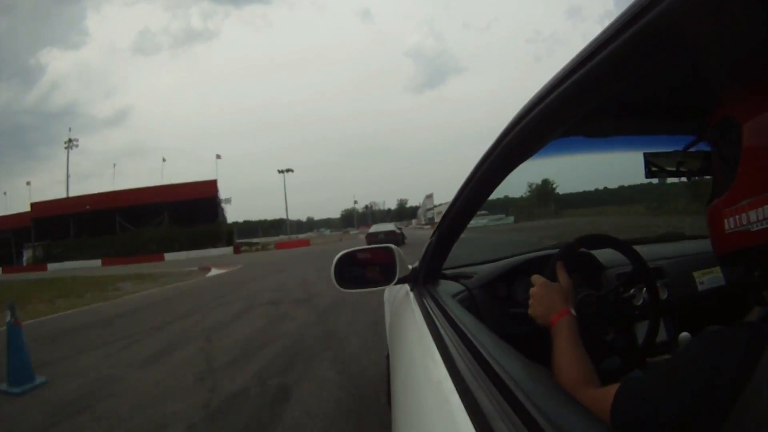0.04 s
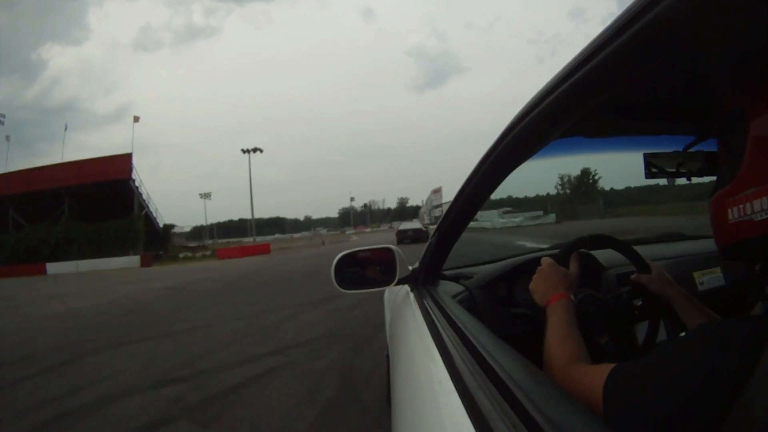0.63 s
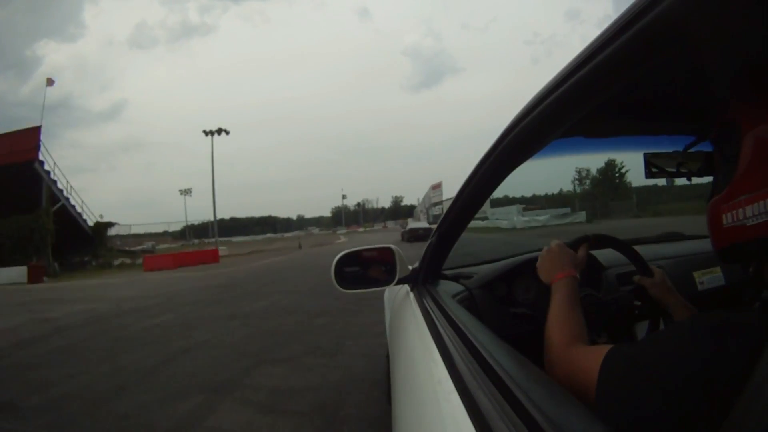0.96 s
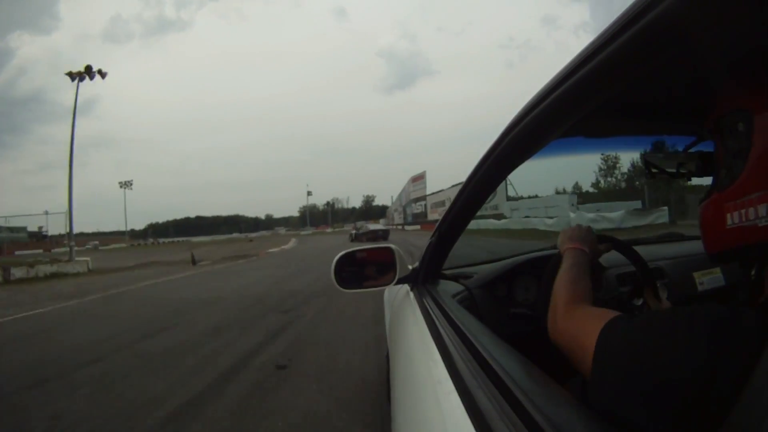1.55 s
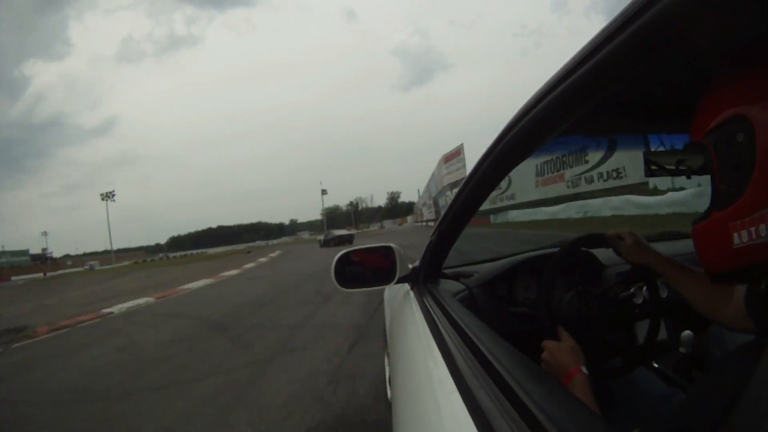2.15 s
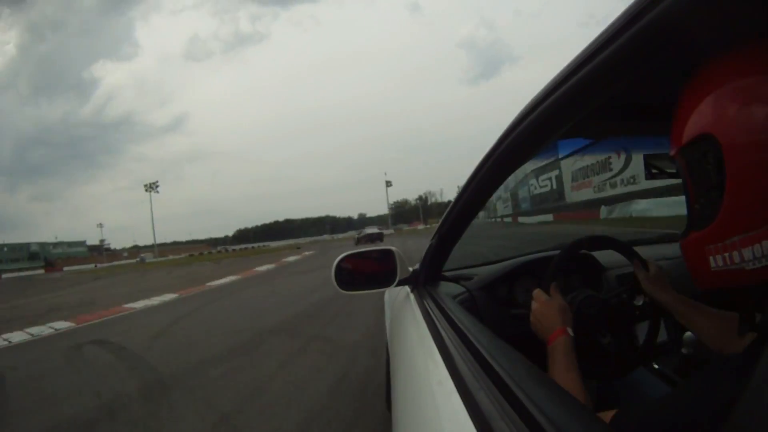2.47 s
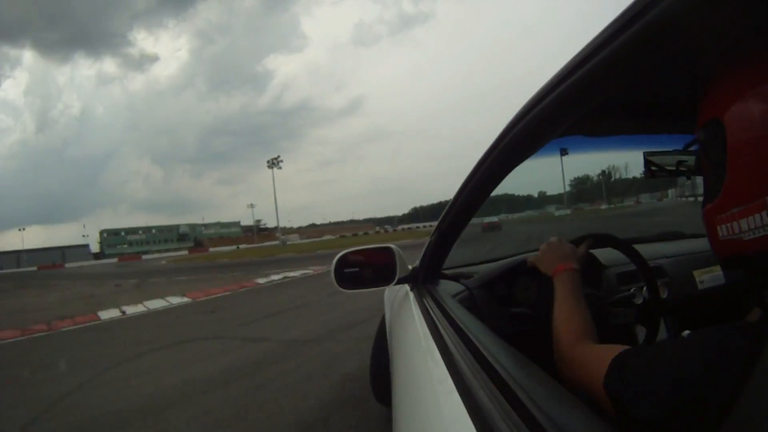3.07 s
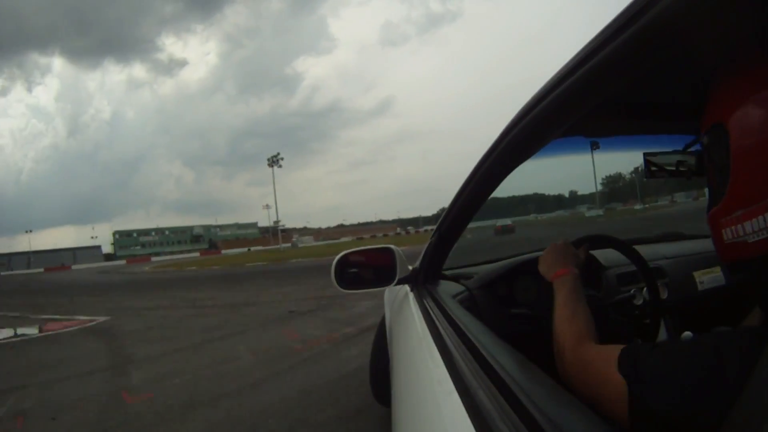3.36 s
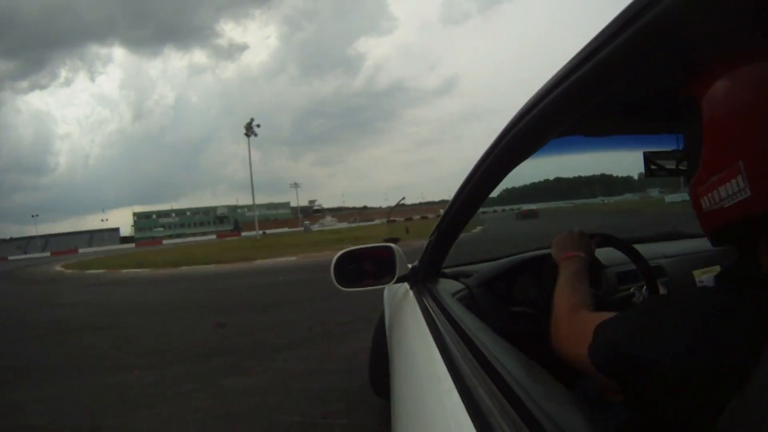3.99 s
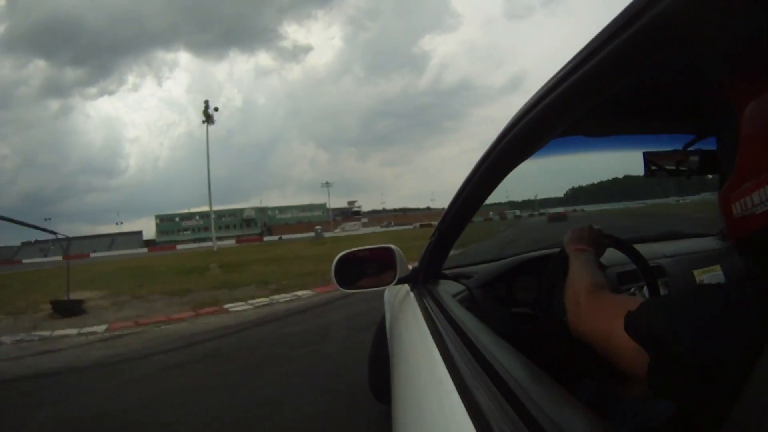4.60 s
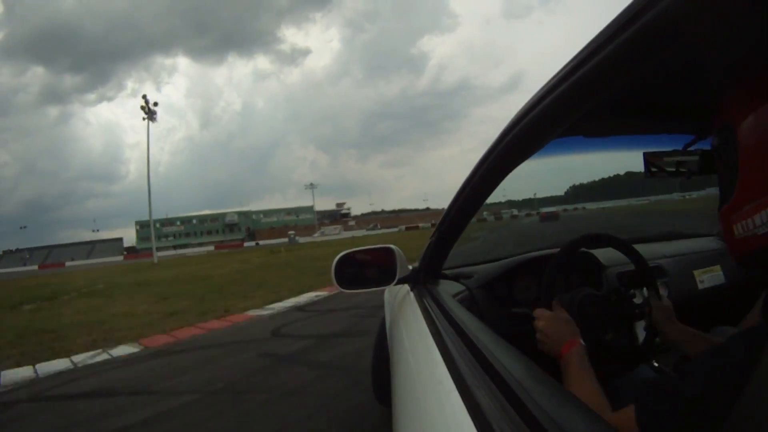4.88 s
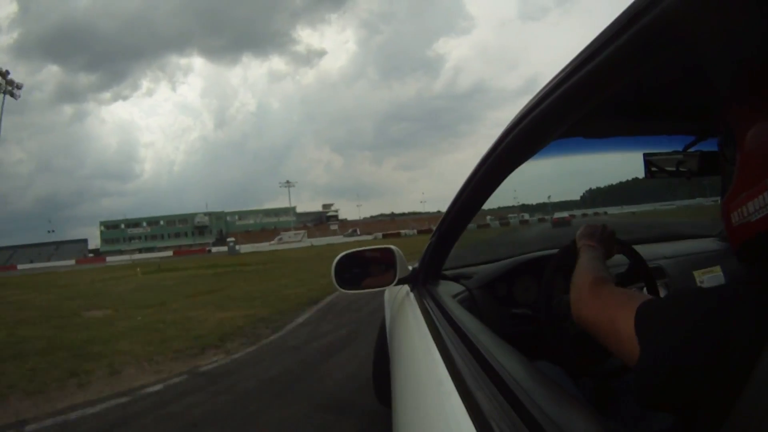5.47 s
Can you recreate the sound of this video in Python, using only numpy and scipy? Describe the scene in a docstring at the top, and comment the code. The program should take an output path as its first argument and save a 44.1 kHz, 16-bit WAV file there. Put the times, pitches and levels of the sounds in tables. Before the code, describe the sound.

Inside a car on a racing circuit, wind rushes and throbs at an open window over road roar and a steady four-cylinder drone. About two seconds in, the engine flares and stays high, its revs wavering. The tyres chirp a few times, then squeal and screech through a long slide with brief breaks, while the wind hiss falls back. A small microphone by the door gives a slightly gritty sound.

```python
"""Inside a drift car with the window open. A four-cylinder engine pulls, flares at a clutch kick and stays
high, its firings droning under the exhaust orders. The tyres break loose, and their tread sticks and slips
in squeals and screeches through a long slide. Wind buffets the cabin and rushes past the door over road
roar. A small camera in a housing takes it in at a low sample rate, mirroring the squeal into the treble."""
import sys
import numpy as np
from scipy.fft import rfft, irfft, next_fast_len
from scipy.io import wavfile
from scipy.ndimage import uniform_filter1d, map_coordinates

SR = 44100
rng = np.random.default_rng(int(sys.argv[2]) if len(sys.argv) > 2 else 0)


def to_wav(s):
    """Save 16-bit WAV."""
    ch = np.atleast_2d(s).T  # columns
    pcm = np.round(np.clip(ch, -1, 1) * 32767)  # PCM
    wavfile.write(sys.argv[1], SR, pcm.astype(np.int16))


N = 248724


def engine(crank, crank_hz, load_db, upper_db=-40.5, cruise_hz=97.2):
    """Two firings a turn give the drone; unequal cylinders add whole and weaker half orders."""
    # the firing tone in the cabin: f/Hz, level/dB
    drone_colour = [(125, -22.5), (136, -25), (150, -29), (185, -28.5), (200, -27), (235, -29.5)]
    # resonances of pipe and cabin: f/Hz, gain/dB
    pipe_colour = [(90, 5), (200, 7.5), (260, -12), (320, -15.5), (400, 2), (450, -4), (500, 5), (600, 1),
                   (700, -10), (800, -16), (1000, 4), (1200, -10)]
    drone_db = along(drone_colour, 2 * crank_hz) + 0.84 * load_db + 2.13 * wobble(28)
    drone = amp(drone_db) * np.sin(2 * crank)
    upper = np.zeros(N)
    for order in np.r_[1.5, np.arange(2.5, 10.5, .5)]:
        db = along(pipe_colour, order * crank_hz) - 9.7 * (order % 1 > 0) + 2.7 * wobble(24)
        upper += amp(db) * np.sin(order * crank + 2 * np.pi * rng.random())
    revs_db = 3.5 * np.log2(crank_hz / cruise_hz)  # the upper orders grow with crank speed
    return drone + amp(upper_db + 0.78 * load_db + revs_db) * upper


def engine_load(answer_s=0.026, recover_s=0.03):
    """Load in dB: zero under steady throttle, moved by each stab and lift of the pedal."""
    # throttle stabs (+) and lifts (-): start/s, end/s, load/dB
    pedal = [(1.42, 1.714, 2.5), (1.91, 2.006, -3), (2.09, 2.28, 2), (2.56, 2.67, 6), (3.216, 3.48, -1),
             (3.605, 3.67, -6), (3.74, 4.12, 1.5), (4.201, 4.254, -3), (4.46, 4.661, -14.5),
             (4.72, 4.96, -5.5), (5.283, 5.45, 2), (5.58, 5.64, -11)]
    return sum(db * held(start, end, answer_s, recover_s) for start, end, db in pedal)


def tyres(judder_db=1.02):
    """Sliding tread squeals in a low mode and screeches in two high ones, over a scrub of torn rubber."""
    # hiss of tearing rubber: f/Hz, level/dB
    scrub_colour = [(700, -17.5), (1400, 1.5), (1700, -0.5), (2000, 5.5), (2350, 7), (2520, -16),
                    (2700, -2.5), (3000, -3.5), (3150, -33), (3400, -17.5), (3800, -10.5), (4020, -19),
                    (5400, -28), (5800, -16)]
    screech_colour = [(1850, 0.5), (2130, 0), (2240, 6), (2290, -0.5), (2350, 2), (2500, 2),
                      (2680, -11.5)]  # f/Hz, gain/dB
    squeal_gain, screech_gain, shrill_gain, pitch, scatter = slides()
    # the most loaded patch holds its note while the fringe strays
    core = tread(pitch, scatter * 0.336, slip_rate=130, flutter_db=3, count=1)
    fringe = tread(pitch, scatter * 1.15, slip_rate=170, flutter_db=3.5, count=6)
    squeal = steadied(fringe + amp(-1.5) * core, seconds=0.084)
    high_mode = tread(2295 + .5 * (pitch - 1065), scatter=.055, slip_rate=230, flutter_db=4.5, count=5)
    screech = steadied(coloured(high_mode, screech_colour), seconds=0.055)
    shrill = tread(3750, scatter=.022, slip_rate=200, flutter_db=3, count=3)
    scrub = amp(-8) * steadied(noise(scrub_colour) * amp(0.48 * wobble(120)), seconds=0.021)
    judder = amp(judder_db * wobble(35))  # bumps vary the load on the tread
    return judder * (squeal_gain * squeal + screech_gain * (screech + scrub) + shrill_gain * shrill)


def slides(break_s=.033, release_s=0.031, full_scatter=.06):
    """Three tread-mode gains, pitch and scatter as the driven tyres break loose and grip again."""
    # slides: start/s, end/s, f/Hz, regrip/0-1, squeal/dB, screech/dB, shrill/dB relative to screech
    skids = [(2.079, 2.154, 1083, 0.03, -28, -27.5, -30), (2.247, 2.334, 1090, 0, -39, -25, -32),
             (2.47, 2.531, 1056, 0.01, -29, -24.5, -33), (2.598, 3.589, 1060, 0.99, -17.5, -19, -39),
             (3.66, 3.77, 1055, 0, -20.5, -28.5, -35), (3.78, 3.856, 1028, 0.02, -16.5, -22, -34),
             (3.991, 4.233, 1046, 0.92, -18.5, -20, -29), (4.324, 4.512, 1062, 0.19, -18, -19, -31),
             (4.55, 5.32, 1075, 0, -18.5, -17.5, -25.5), (5.349, 5.6, 1059, .9, -18, -17.5, -26.5)]
    bite_hz, bite_s = 50.32, .04  # the squeal starts sharp and settles
    regrip_hz, regrip_s, narrowing, regrip_db = 49.7, .09, 0.691, 1  # regrip lifts, narrows, swells it
    t = np.arange(N) / SR
    squeal, screech, shrill, pitch, scatter = np.zeros((5, N))
    for start, end, hz, regrip, squeal_db, screech_db, shrill_db in skids:
        slip = held(start, end, break_s, release_s)
        bite = np.exp(-np.maximum(t - start, 0) / bite_s)
        grip = regrip * np.exp(-(np.minimum(t - end, 0) / regrip_s) ** 2)
        begun = t > start - break_s
        pitch = np.where(begun, hz + bite_hz * bite + regrip_hz * grip, pitch)
        scatter = np.where(begun, full_scatter * (1 - narrowing * grip), scatter)
        squeal = np.maximum(squeal, slip * amp(squeal_db + regrip_db * grip))
        screech = np.maximum(screech, slip * amp(screech_db))
        shrill = np.maximum(shrill, slip * amp(screech_db + shrill_db))
    return squeal, screech, shrill, pitch, scatter


def tread(pitch, scatter, slip_rate, flutter_db, count):
    """Patches of rubber stick and slip, each wandering in pitch and strength on the rough asphalt."""
    patches = np.zeros(N)
    for _ in range(count):
        strength = amp(flutter_db * wobble(slip_rate))
        hz = pitch * (1 + scatter * wobble(slip_rate))
        patches += strength * np.sin(phase_of(hz))
    return unit(patches)


def high_tyre(attack_s=0.027, release_s=0.058):
    """A less loaded tyre scuffs broadly at first, then sings thinly above the others."""
    # its squeals: start/s, end/s, f/Hz, level/dB, scatter/share of the pitch
    squeals = [(2.25, 2.326, 1630, -26, .085), (2.519, 3.2, 1280, -29.5, .08),
               (4.052, 4.18, 1370, -27, .075), (4.35, 4.45, 1350, -28.5, .07),
               (4.553, 4.722, 1267, -31, .015), (4.83, 4.929, 1275, -23.5, .015),
               (5.04, 5.12, 1258, -24, .016), (5.349, 5.538, 1287, -29, .03)]
    sound = np.zeros(N)
    for start, end, hz, db, scatter in squeals:
        envelope = amp(db) * held(start, end, attack_s, release_s)
        sound += envelope * tread(hz, scatter, slip_rate=140, flutter_db=3, count=3)
    return sound


def buffeting():
    """The cabin air throbs against the open window, with a heaving boom above it."""
    # fader ride of both layers: t/s, throb/dB, boom/dB
    ride = [(0, -28, -27.6), (0.25, -22.5, -20.5), (1.15, -22.5, -19.5), (1.4, -19, -23.5),
            (1.7, -23, -17.5), (2.05, -17, -24), (2.35, -23.5, -17.4), (2.55, -18.5, -25),
            (3.15, -28.5, -23), (3.4, -32, -25), (3.6, -18.5, -19.0), (3.8, -28, -24), (4.02, -20, -17),
            (4.2, -30.8, -24), (4.38, -17, -22), (4.65, -32.5, -28.1), (5.45, -29.6, -23.0),
            (5.64, -31, -30)]
    # sub-bass throb of the cabin air: f/Hz, level/dB
    throb_colour = [(12, -34), (22, -9), (30, 9.5), (40, 0), (55, -10.5), (90, -67), (200, -92)]
    # cabin boom: f/Hz, level/dB
    boom_colour = [(35, -13), (60, -9.5), (80, 5.5), (100, -5.5), (125, -16), (170, -22), (330, -57),
                   (1500, -110)]
    # the boom heaves (+) or drops out (-): t/s, length/s, gain/dB
    heaves = [(.55, 0.079, 3.5), (1.11, .06, 5.5), (1.27, 0.052, 6), (1.35, 0.071, -8), (2.33, .05, 3),
              (3.61, 0.039, 5), (3.69, 0.089, -3), (4.07, 0.09, 1.5), (5.04, .06, 5)]
    throb_db, boom_db = curves(ride)
    throb = amp(throb_db + 0.35 + 1.1 * wobble(12)) * steadied(noise(throb_colour), seconds=0.074)
    boom_gain = amp(boom_db + 0.1 + swells(heaves) + 1.6 * wobble(11))
    return throb + boom_gain * steadied(noise(boom_colour), seconds=0.068)


def wind_strength(breeze_db=-41.5, swirl_db=1.03):
    """Drive of the wind noise in dB over a breeze: a slow trend, brief rises and dips, a little swirl."""
    # slow trend of the wind: t/s, level/dB
    trend = [(0, -37.5), (0.5, -39.5), (1.3, -41.5), (1.65, -41), (1.95, -40.5), (2.3, -38), (2.45, -47),
             (2.85, -55), (3.05, -47), (3.55, -53.5), (3.7, -50.5), (3.92, -53), (4.08, -45.2), (4.25, -49),
             (4.4, -44), (4.55, -50.5), (5.05, -48), (5.64, -51)]
    # gusts (+) and lulls (-); the last two are dips in the hiss as the tyres briefly grip:
    # t/s, length/s, gain/dB
    rises_and_dips = [(.12, .06, 2), (.168, 0.016, 6), (0.22, 0.07, -5), (0.473, 0.02, 5.5),
                      (0.721, 0.035, 7), (0.844, 0.04, -4.5), (1.085, 0.033, 3), (1.175, 0.064, -6),
                      (1.405, 0.035, -8), (1.686, 0.12, 3.5), (1.765, .03, -6), (1.845, .03, -4),
                      (3.66, 0.076, -4), (3.93, .06, -4)]
    trend_db, = curves(trend)
    return trend_db - breeze_db + swells(rises_and_dips) + swirl_db * wobble(25.1)


def window_rush(wind_db, load_db, eddies):
    """Turbulent air rushes past the window, fluttering with the eddies."""
    # bright rush of air: f/Hz, level/dB
    colour = [(880, -18), (1500, -10), (1560, -30), (1800, -15), (1970, -0.5), (2140, -0.5), (2330, 1.5),
              (2790, -12), (2920, -9), (3270, -10), (3750, -13), (4210, -20), (5380, -17.5), (5900, -23),
              (7670, -58), (13000, -120)]
    flutter = amp(2.13 * eddies + 1.56 * wobble(260))
    rush = steadied(unit(noise(colour) * flutter), seconds=0.037)
    return amp(-24.5 + wind_db + .15 * load_db) * rush


def air_slaps(attack_s=0.00024, t60_s=0.019):
    """Eddies break on the window frame in short bright puffs."""
    # slaps of air: t/s, level/dB
    hits = [(0.457, -12), (1.064, -9.5), (1.078, -14), (1.588, -4), (1.868, -9), (2.194, -14), (4.438, -11)]
    colour = [(200, -11), (900, 3.5), (1600, -9), (2300, 10), (2800, -6.5), (3800, -2),
              (5800, -22.5)]  # f/Hz, level/dB
    t = np.arange(N) / SR
    envelope = np.zeros(N)
    for start, db in hits:
        age = np.maximum(t - start, 0)
        envelope += amp(db - 1.5 - 60 * age / t60_s) * (1 - np.exp(-age / attack_s))
    return envelope * noise(colour)


def road_roar(crank, wind_db, load_db, eddies):
    """A fluttering bed of road noise that grows with wind and engine load."""
    # midrange roar of the road: f/Hz, level/dB
    colour = [(200, -20), (330, -11.5), (440, -7), (520, 2.5), (650, 1), (780, -3), (900, -0.5),
              (1050, 4.5), (1170, -3.5), (1300, 1), (1600, -7.5), (2000, 1), (2700, -16), (4000, -49)]
    rasp = 1 + 0.091 * np.sin(2 * crank)  # exhaust gas adds a puff at each firing
    roar = steadied(unit(noise(colour) * rasp * amp(1.5 * eddies)), seconds=0.066)
    return amp(-26.5 + 0.46 * wind_db + 0.47 * load_db) * roar


def door_drumming(wind_db, load_db):
    """The door panels drum low, driven by wind and engine load."""
    # rumble of the panels: f/Hz, level/dB
    colour = [(60, -19), (110, 9), (150, 5), (190, 6.5), (240, 3), (300, -2), (370, -6), (450, -8.5),
              (900, -47)]
    return amp(-30.5 + 0.62 * wind_db + 0.46 * load_db) * steadied(noise(colour), seconds=0.08)


def housing(sound):
    """The camera housing colours the sound with narrow peaks and dips."""
    # peaks and dips: f/Hz, width/Hz, gain/dB
    bands = [(1650, 30, -3), (1685, 25, 5.5), (2400, 17, 4), (2820, 100, -2.5), (2930, 48, 4.5),
             (3250, 60, -2), (3280, 54, 2), (3450, 61, -2.5), (4480, 47, 5), (4560, 60, 0.5), (5000, 90, 0),
             (5250, 71, 2.5)]
    return filtered(sound, lambda hz: amp(sum(db * np.exp(-((hz - centre) / width) ** 2)
                                              for centre, width, db in bands)))


def amp(db):
    """Decibels to gain."""
    return 10 ** (np.asarray(db) / 20)


def unit(x):
    """Scale to rms 1."""
    return x / np.sqrt(np.mean(x ** 2) + 1e-20)


def curves(rows):
    """One value per sample for each column after the time."""
    times, *columns = np.transpose(rows)
    return [np.interp(np.arange(N) / SR, times, column) for column in columns]


def along(points, hz):
    """Read (f/Hz, value) points at hz on a log axis."""
    freqs, values = np.transpose(points)
    return np.interp(np.log(hz + 1), np.log(freqs + 1), values)


def held(start, end, attack, release):
    """A gain that rises around start, holds until end and dies away."""
    t = np.arange(N) / SR
    rise = np.minimum(t - start - attack / 2, 0) / attack
    return np.exp(-rise ** 2 - np.maximum(t - end, 0) / release)


def swells(rows):
    """Bell-shaped rises and dips in dB from (t/s, length/s, gain/dB) rows."""
    t = np.arange(N) / SR
    return sum(db * np.exp(-(2 * (t - centre) / length) ** 2) for centre, length, db in rows)


def wobble(rate):
    """A smooth random curve, rate knots a second."""
    knots = rng.standard_normal(int(N * rate / SR) + 4)
    return map_coordinates(knots, [np.arange(N) * rate / SR])


def phase_of(hz):
    """Running phase of a moving frequency."""
    return 2 * np.pi * np.cumsum(hz) / SR


def filtered(x, response):
    """x through a frequency response."""
    size = next_fast_len(N + SR // 2)
    return irfft(rfft(x, size) * response(np.fft.rfftfreq(size, 1 / SR)), size)[:N]


def coloured(x, points):
    """x through an EQ curve of (f/Hz, gain/dB) points, at rms 1."""
    return unit(filtered(x, lambda hz: amp(along(points, hz))))


def noise(points):
    """Coloured noise of rms 1."""
    return coloured(rng.standard_normal(N), points)


def steadied(x, seconds):
    """x with its slow swells evened out."""
    power = np.abs(uniform_filter1d(x * x, max(int(seconds * SR), 2)))
    return x / np.sqrt(power + 1e-4)


def scene():
    """Engine, tyres, wind and road meet at one microphone in a housing by the door."""
    # crank speed, flaring at the clutch kick: t/s, f/Hz
    revs = [(0.06, 64.4), (1.39, 66.2), (1.92, 70.2), (2.02, 75.3), (2.13, 100.9), (2.2, 116), (2.34, 101),
            (2.73, 93.4), (3.1, 101.3), (3.39, 95.6), (3.62, 102.4), (3.9, 95.2), (4.04, 107.1),
            (4.21, 95.16), (4.33, 101), (4.75, 90.15), (5.3, 96), (5.64, 88)]
    crank_hz, = curves(revs)
    load_db = engine_load()
    crank = phase_of(crank_hz * (1 + .002 * wobble(29.93)))
    cabin = engine(crank, crank_hz, load_db)
    wind_db = wind_strength()
    cabin += buffeting() + door_drumming(wind_db, load_db)
    eddies = wobble(70)  # road and rush flutter together
    cabin += road_roar(crank, wind_db, load_db, eddies) + window_rush(wind_db, load_db, eddies)
    cabin += tyres() + high_tyre() + air_slaps()
    housed = housing(cabin)
    return np.array([housed, housed])


def record(dry, hold_hz=12000, mirror_db=-0.5, cutoff_hz=5800, top_hz=15300):
    """The camera rounds off peaks and holds each slow sample, mirroring the sound about its sample rate."""
    dulled = filtered(dry[0], lambda hz: 1 / np.sqrt(1 + (hz / cutoff_hz) ** 40))
    rounded = dulled / (1 + np.abs(dulled) ** 8) ** (1 / 8)
    clock = np.cos(2 * np.pi * hold_hz * np.arange(N) / SR)
    mirrored = rounded * (1 + 2 * amp(mirror_db) * clock)
    out = filtered(mirrored, lambda hz: np.sinc(hz / hold_hz) * (hz < top_hz))  # holding dims the treble
    return np.array([out, out])


dry = scene()
out = record(dry)
to_wav(out)
```